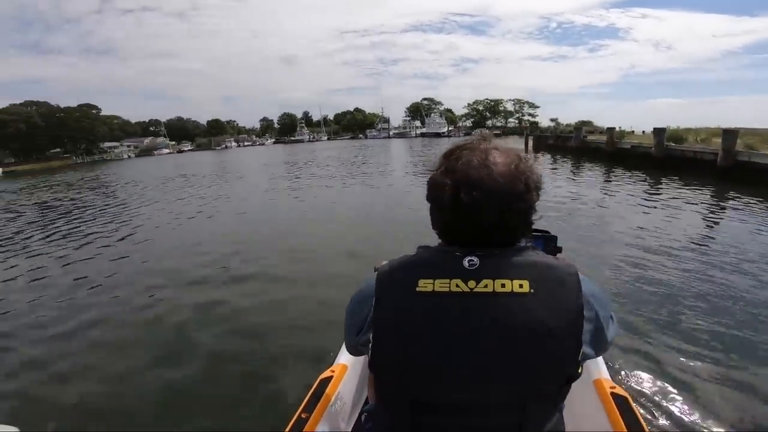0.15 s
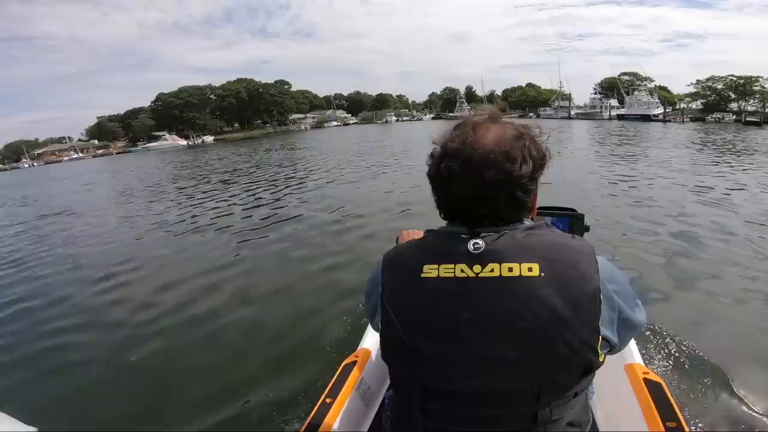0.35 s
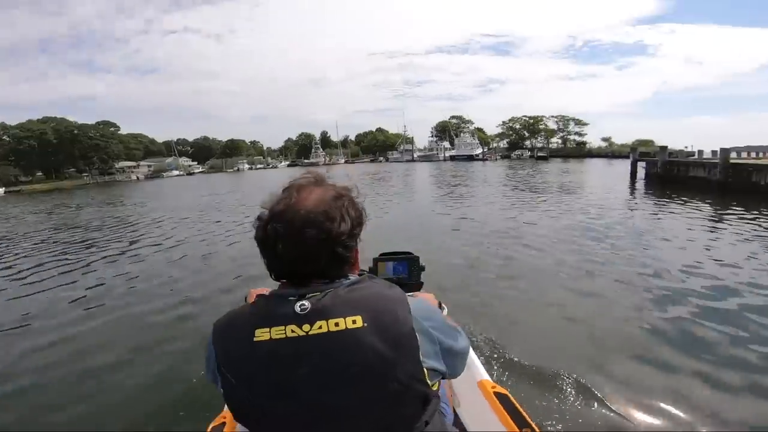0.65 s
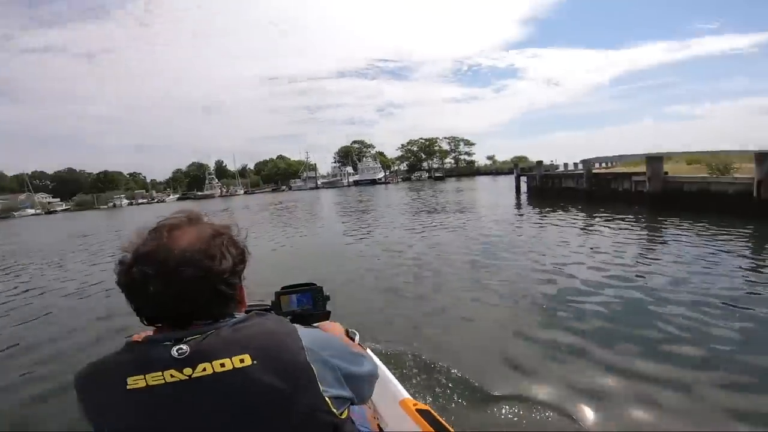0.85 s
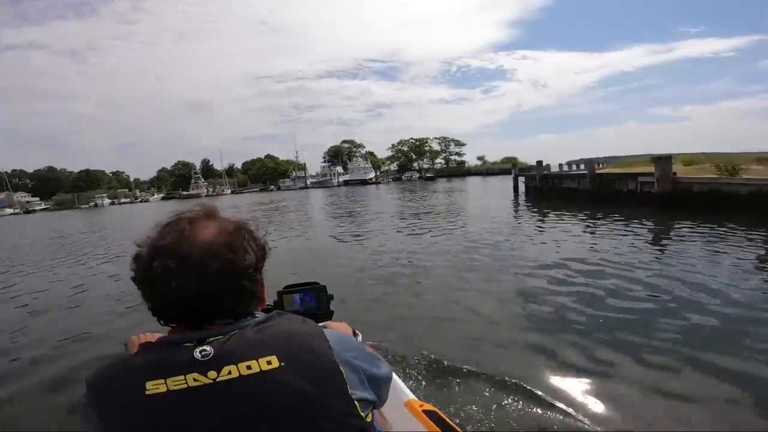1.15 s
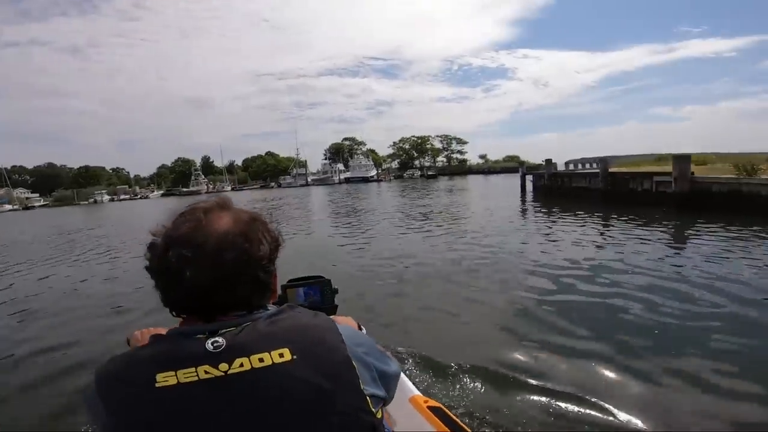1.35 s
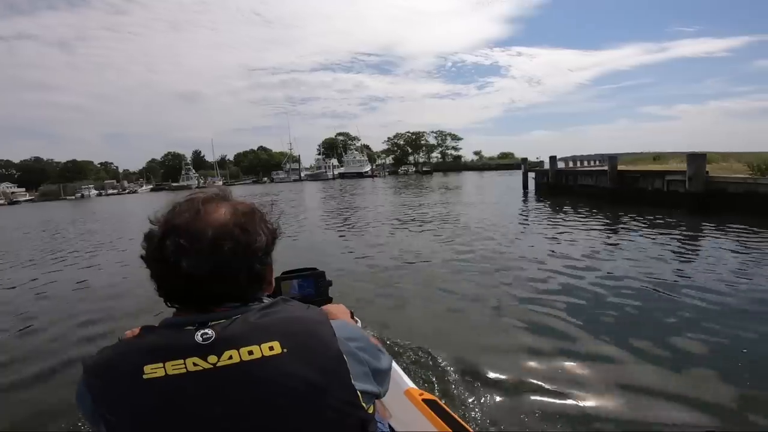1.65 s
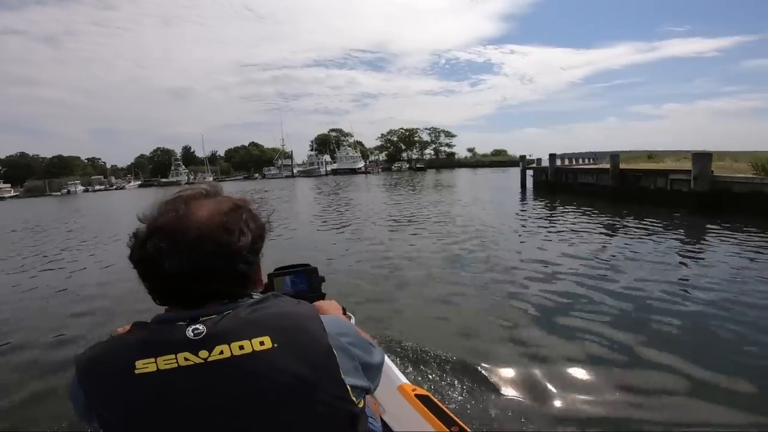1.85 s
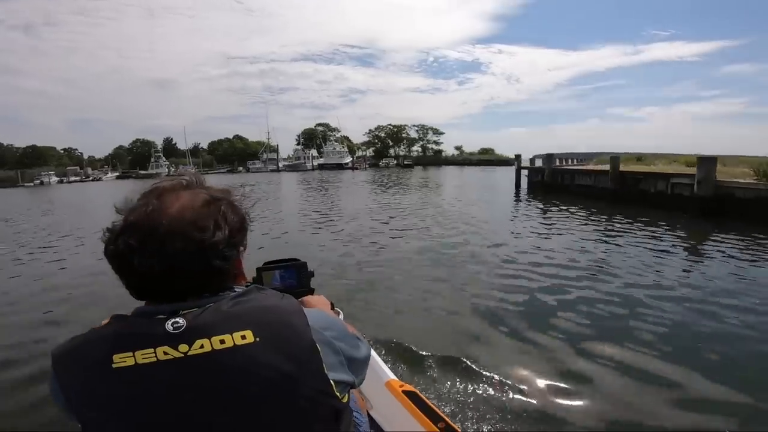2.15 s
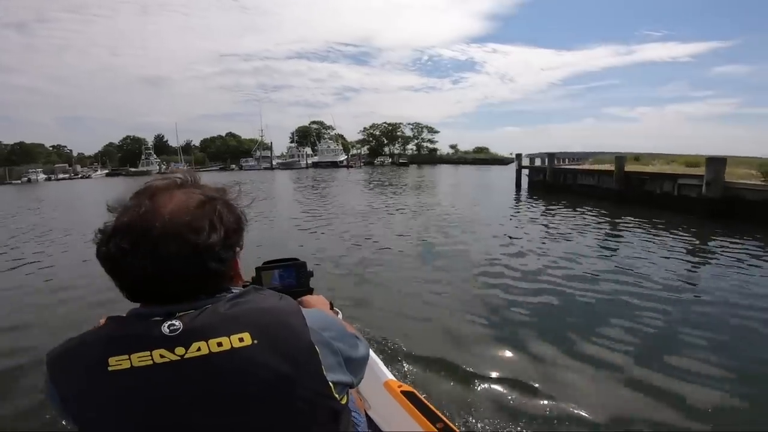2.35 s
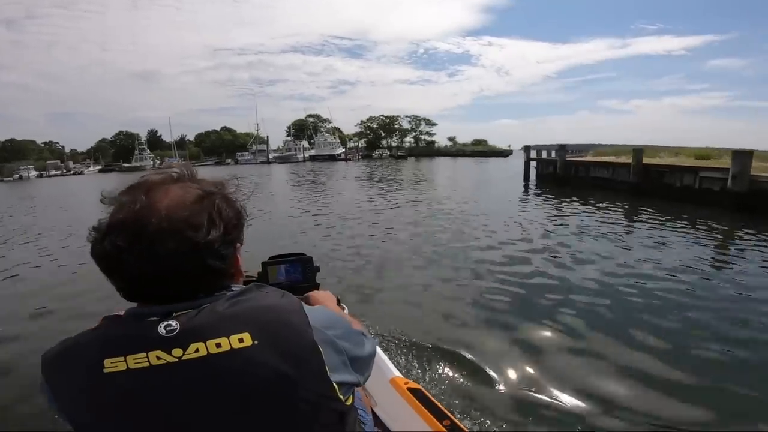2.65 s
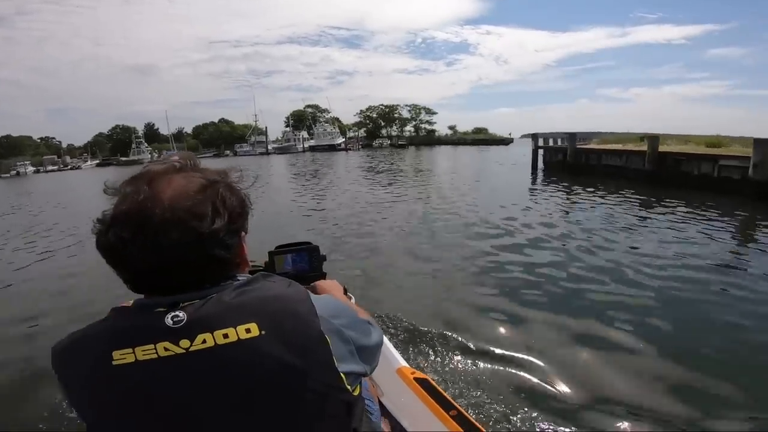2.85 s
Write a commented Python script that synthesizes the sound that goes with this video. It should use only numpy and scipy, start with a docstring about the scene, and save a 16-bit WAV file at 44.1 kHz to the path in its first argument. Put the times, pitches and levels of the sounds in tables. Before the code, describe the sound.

A personal watercraft engine idles with a low, gurgling thrum, heard from the back seat on calm water. After a brief dropout near the start, water washes and small waves slap the hull, and the exhaust grows louder.

```python
"""A personal watercraft idles across a calm harbor, heard from the back seat.
From the start its three-cylinder engine thrums and gurgles through a wet exhaust and shakes the hull,
water washes, fizzes and drips, and a light hiss spurts over low wind. At 0.4 s the sound cuts out.
At 0.58 s it fades back in as mono, with more wash, no hiss and the exhaust outlet under water.
Small waves then slap the hull, and from 2.3 s the exhaust grows louder."""
import sys
import numpy as np
from scipy import signal
from scipy.fft import rfft, irfft
from scipy.io import wavfile
from scipy.ndimage import uniform_filter1d

SR = 44100
rng = np.random.default_rng(int(sys.argv[2]) if len(sys.argv) > 2 else 0)


def digitize_waveform(pressure):
    """Quantize a signal to 16-bit integers and store it at the path in sys.argv[1].

    Rows of a 2-D input are taken as channels; values are limited to [-1, 1].
    """
    field = np.atleast_2d(pressure).T
    bounded = np.clip(field, -1, 1)
    quanta = np.round(bounded * 32767).astype(np.int16)
    wavfile.write(sys.argv[1], SR, quanta)


N = 132300
TIME = np.arange(N) / SR
FREQS = np.fft.rfftfreq(N, 1 / SR)
CUT_S, RETURN_S = .4005, .58


def amp(db):
    """Decibels to gain."""
    return 10 ** (np.asarray(db) / 20)


def unit(x):
    """Scales to rms 1."""
    return x / np.sqrt(np.mean(x ** 2) + 1e-20)


def curve(rows, column=1):
    """One column of a time table, at every sample."""
    rows = np.array(rows)
    return np.interp(TIME, rows[:, 0], rows[:, column])


def at_hz(rows, hz):
    """Interpolates a table on a log-frequency axis."""
    row_hz, value = np.transpose(rows)
    return np.interp(np.log(hz + 1), np.log(row_hz), value)


def resonate(x, spectrum):
    """Minimum-phase filter with this spectrum; output at rms 1."""
    log_gain = np.log(amp(at_hz(spectrum, abs(np.fft.fftfreq(N, 1 / SR)))))
    response = np.exp(np.conj(signal.hilbert(log_gain)))[:len(FREQS)]
    return unit(irfft(rfft(x) * response, N))


def churn(spectrum, patch_db, flicker_db, correlation=None, size=512):
    """Stereo noise with random patches in time and frequency and a shared flicker."""
    hop = size // 4
    frames, hz = N // hop + 5, np.fft.rfftfreq(size, 1 / SR)
    mid_re, mid_im, side_re, side_im, patches = rng.standard_normal((5, frames, len(hz)))
    patches = uniform_filter1d(patches, size=14, axis=0)
    patches = unit(uniform_filter1d(patches, size=7, axis=1))
    flicker = unit(uniform_filter1d(rng.standard_normal(frames), size=5))[:, None]
    alike = 0 if correlation is None else at_hz(correlation, hz)
    mid = np.sqrt(1 + alike) * (mid_re + 1j * mid_im)
    side = np.sqrt(1 - alike) * (side_re + 1j * side_im)
    gain = amp(at_hz(spectrum, hz) + patch_db * patches + flicker_db * flicker)
    bins = np.array([mid + side, mid - side]) * gain
    _, noise = signal.istft(bins.transpose(0, 2, 1), nperseg=size, noverlap=size - hop)
    return unit(noise[:, :N])


def muffler(clicks, spectrum, center_hz=200, delay_s_per_hz=.00009):
    """Rounds each click into a thud and draws it out, low notes first."""
    delay_s = delay_s_per_hz * np.clip(FREQS - center_hz, -center_hz / 2, center_hz / 2)
    phase = 2 * np.pi * np.cumsum(delay_s) * FREQS[1]
    return unit(irfft(rfft(clicks) * amp(at_hz(spectrum, FREQS)) * np.exp(-1j * phase), N))


# Each row: time in seconds, thrum level in dB, gurgle level in dB.
EXHAUST_LEVELS = [(0, -26, -35), (.4, -25.7, -34), (.65, -28.8, -35), (.95, -29, -33.5),
                  (1.3, -27.2, -30.5), (1.55, -29, -33), (1.8, -30, -35), (2.05, -29.3, -33),
                  (2.25, -28.5, -32), (2.29, -23.5, -26.5), (2.5, -23.5, -24.3), (2.62, -24.2, -26),
                  (2.75, -23.2, -25), (2.88, -23, -26.5), (3, -23, -27)]
# Each entry: one cylinder's relative strength in dB with the outlet fully submerged.
CYLINDER_DB = [-2.2, -.6, 2.0]
# Each row: time in seconds, boost of the nearest firing in dB.
COUGHS = [(1.103, 3), (1.235, 2.5), (1.297, 2.5), (2.287, 2), (2.485, 1), (2.55, 1.5), (2.726, 4.5),
          (2.812, 1), (2.985, 3)]
# Pipe and hull, outlet submerged or clear. Each row: frequency in Hz, relative gain in dB.
PIPE_SUBMERGED = [(25, -40), (60, -28), (105, -27), (137, -11), (183, -.5), (229, -.5), (274, -11),
                  (330, -19), (450, -30), (800, -40), (2000, -53), (5000, -83), (12000, -125)]
PIPE_CLEAR = [(25, -31.5), (60, -20.5), (100, -12.5), (137, 4), (183, 6.5), (229, 1), (274, -9),
              (330, -7.5), (450, -29), (800, -51), (2000, -51), (5000, -77.5), (12000, -125)]


def exhaust_thrum(firing_count, submerged, scatter_db=.9, jitter_s=.00036):
    """Firings thud in the pipe; under water their strength and timing turn uneven."""
    onsets = np.flatnonzero(np.diff(np.floor(firing_count)) > 0) + 1
    scatter, jitter = rng.standard_normal((len(onsets), 2)).T
    uneven = np.sqrt(submerged[onsets])
    cylinder_db = np.take(CYLINDER_DB, firing_count[onsets].astype(int), mode="wrap")
    strength_db = uneven * (cylinder_db + scatter_db * scatter)
    for time_s, boost_db in COUGHS:
        strength_db[np.argmin(abs(TIME[onsets] - time_s))] += boost_db
    onsets += (jitter_s * SR * uneven * jitter).astype(int)
    clicks = np.zeros(N)
    clicks[np.clip(onsets, 0, N - 1)] = amp(strength_db)
    thuds = submerged * muffler(clicks, PIPE_SUBMERGED) + (1 - submerged) * muffler(clicks, PIPE_CLEAR)
    return thuds * amp(curve(EXHAUST_LEVELS))


# Broad gurgle, and a narrow bubbling tone heard when its pitch briefly lifts.
# Each row: frequency in Hz (the tone's before lift_ratio), relative density in dB.
GURGLE_SPECTRUM = [(40, -23.5), (115, -28), (150, 4.5), (200, -2.5), (260, 4), (310, -9.5), (420, -19),
                   (800, -28), (3000, -74.5), (10000, -100)]
BUBBLE_SPECTRUM = [(60, -40), (150, -16), (185, 0), (215, 0), (255, -14), (500, -36), (5000, -100)]


def exhaust_gurgle(firing_count, submerged):
    """Gas bubbles out, puffed by the strongest cylinder; the pitch lifts once, briefly."""
    puff_lag_firings, puff_width_cycles, puff_depth = .1, .12, .8
    lift_center_s, lift_half_s, lift_ratio = 2.43, .14, 1.25
    cycles = (firing_count - np.argmax(CYLINDER_DB) - puff_lag_firings) / len(CYLINDER_DB)
    from_puff = (cycles + .5) % 1 - .5
    puffs = unit(1 + puff_depth * submerged * np.exp(-(from_puff / puff_width_cycles) ** 2))
    gas = rng.standard_normal(N)
    lift = np.exp(-((TIME - lift_center_s) / lift_half_s) ** 2)
    lifted = resonate(gas, np.multiply(BUBBLE_SPECTRUM, [lift_ratio, 1]))
    bubbling = (1 - lift) * resonate(gas, GURGLE_SPECTRUM) + lift * lifted
    return bubbling * puffs * amp(curve(EXHAUST_LEVELS, column=2))


# Each row: time in seconds, level in dB.
HUM_LEVEL = [(0, -46), (.4, -44), (.7, -42), (1.6, -38), (2.2, -35.5), (3, -36)]


def hull_hum(firing_count):
    """The hull shakes at the firing rate."""
    return amp(curve(HUM_LEVEL)) * unit(np.sin(2 * np.pi * firing_count))


# Each row: time in seconds, firings per second.
FIRING_RATE = [(0, 45.55), (.15, 45.7), (.4, 45.7), (.6, 45.9), (.9, 46.15), (1.12, 45.25), (1.35, 46.0),
               (1.55, 45.25), (1.75, 45.75), (2.1, 45.95), (2.25, 45.1), (2.36, 45.7), (2.48, 45.0),
               (2.65, 45.75), (3, 45.4)]
# Each row: time in seconds, outlet submersion from 0 to 1.
SUBMERSION = [(0, .12), (.4, .12), (.6, .95), (2.55, .95), (2.75, .6), (3, .5)]


def engine():
    """One crank times the thrum, gurgle and hum; its phase jumps as the sound returns."""
    offset_firings = np.where(TIME < RETURN_S, .1, -.465)
    firing_count = np.cumsum(curve(FIRING_RATE)) / SR + offset_firings
    submerged = curve(SUBMERSION)
    exhaust = exhaust_thrum(firing_count, submerged) + exhaust_gurgle(firing_count, submerged)
    return exhaust + hull_hum(firing_count)


# Each row: time in seconds, wash level in dB, fizz level in dB.
WATER_LEVELS = [(0, -36, -47), (.12, -36.5, -48.5), (.4, -36, -46.5), (.62, -33, -45.5), (.73, -34, -47.5),
                (.81, -31.5, -43.5), (.94, -32.5, -42.5), (1.11, -30.5, -42), (1.25, -33, -42.5),
                (1.6, -33.5, -41), (1.77, -33, -40.5), (1.92, -31, -42), (2.15, -29, -40.5),
                (2.48, -31.5, -40.5), (2.76, -30, -42), (3, -31, -41)]
# Each row: frequency in Hz, relative density in dB.
WASH_SPECTRUM = [(20, -3.5), (45, 3.5), (70, 6), (110, 3.5), (300, 5), (380, -0.5), (480, 0.5), (620, -2),
                 (900, -10), (1400, -20), (2500, -34), (5000, -75.5), (12000, -87)]
FIZZ_SPECTRUM = [(200, 2), (600, -14), (1100, 4.5), (1800, -2.5), (3000, -7), (4200, -15), (5500, -25),
                 (7800, -26.5), (10000, -41.5), (12000, -40.5), (14500, -54), (16000, -78)]
# Each row: frequency in Hz, left-right correlation.
WATER_CORRELATION = [(60, 1), (130, 0.79), (300, 0.9), (630, 0.74), (1300, -.2), (3000, 0.22), (6600, 0.12)]


def bow_wave():
    """The bow wave washes along the hull and its foam fizzes."""
    wash = churn(WASH_SPECTRUM, patch_db=.5, flicker_db=1, correlation=WATER_CORRELATION, size=1024)
    fizz = churn(FIZZ_SPECTRUM, patch_db=1.38, flicker_db=1.23, correlation=WATER_CORRELATION)
    return wash * amp(curve(WATER_LEVELS)) + fizz * amp(curve(WATER_LEVELS, column=2))


def droplets(rate_per_s=700, level_db=-47, pitches=36, decay_cycles=1.15, tilt_db_per_octave=-6.5):
    """Droplets and small bubbles ping with rising pitch, following the level of the fizz."""
    t, out = np.arange(0, .03, 1 / SR), np.zeros((2, N))
    for hz in np.geomspace(700, 9000, pitches):
        envelope = np.exp(-t * hz / decay_cycles) * (1 - np.exp(-t * hz))
        ping = np.sin(2 * np.pi * hz * t * (1 + 4 * t)) * envelope
        strength_db = np.minimum(rng.exponential(1, N), 4.5)
        hits = rng.random(N) < rate_per_s / pitches / SR
        pings = signal.oaconvolve(amp(strength_db) * hits, ping)[:N]
        pan = rng.uniform(-.3, .3)
        out += np.outer([1 + pan, 1 - pan], pings) * amp(tilt_db_per_octave * np.log2(hz))
    foam = amp(curve(WATER_LEVELS, column=2))
    return amp(level_db) * unit(out) * unit(foam)


# Each row: time in seconds, level in dB.
HISS_LEVEL = [(0, -39), (.03, -38.5), (.085, -47), (.15, -51), (.19, -38), (.21, -47), (.238, -34.5),
              (.266, -57), (.36, -57.5), (.4, -38)]
# Each row: frequency in Hz, relative density in dB.
HISS_SPECTRUM = [(150, 12), (700, 5.5), (1500, 1.5), (2300, -2), (3000, -3), (4700, -5), (6000, -8),
                 (7500, -6.5), (10000, -10.5), (11500, -25), (14500, -27.5), (16000, -29)]


def hiss():
    """A wide hiss in short spurts, at the opening only."""
    noise = churn(HISS_SPECTRUM, patch_db=1.5, flicker_db=-.5)
    return noise * amp(curve(HISS_LEVEL)) * (TIME < RETURN_S)


def whistle(pitch_hz=5900, width_hz=340, level_db=-48.5, fade_s=.049):
    """A narrow band of noise whistles with the first spurt of hiss."""
    band = np.exp(-.5 * ((FREQS - pitch_hz) / width_hz) ** 2)
    noise = unit(irfft(rfft(rng.standard_normal((2, N))) * band, N))
    return noise * amp(level_db) * np.exp(-(TIME / fade_s) ** 2)


# Each row: time in seconds, mid level in dB.
WIND_LEVEL = [(0, -36), (.2, -36), (.33, -34), (.39, -28), (.6, -38.5), (3, -40)]
# Each row: frequency in Hz, relative density in dB.
WIND_SPECTRUM = [(3, -20), (16, -9), (30, 0), (44, -9), (90, -10), (150, -26), (500, -58), (5000, -105)]


def wind(side_gain=.386):
    """Wind rumbles low, with one gust just before the cut."""
    mid, side = (resonate(noise, WIND_SPECTRUM) for noise in rng.standard_normal((2, N)))
    return (mid + side_gain * np.array([side, -side])) * amp(curve(WIND_LEVEL))


# Each row: start in seconds, level in dB, pitch in Hz, decay in seconds.
PLIPS = [(.363, -38.5, 2730, 0.0033), (0.672, -53, 6500, 0.00057), (2.12, -47, 7300, .001),
         (2.766, -42, 4620, 0.0011), (2.813, -52, 8590, 0.00056)]


def plips():
    """Single near drops ring briefly."""
    out = np.zeros(N)
    for start_s, db, hz, decay_s in PLIPS:
        t = np.maximum(TIME - start_s, 0)
        out += amp(db) * np.exp(-t / decay_s) * np.sin(2 * np.pi * hz * t)
    return out


# Each row: center in seconds, level in dB, pitch in Hz, half length in seconds, relative bandwidth.
SLAPS = [(0.803, -42, 633, 0.0067, 0.23), (0.819, -33, 600, 0.026, 0.1), (0.823, -58.5, 3860, 0.12, .15),
         (0.962, -46.5, 1970, 0.021, 0.18), (1.051, -44, 1830, 0.028, 0.17), (1.114, -27, 106, 0.025, 0.47),
         (1.249, -35.5, 370, 0.085, 0.16), (1.414, -34, 424, 0.021, 0.39), (1.547, -25.5, 119, 0.022, 0.28),
         (1.578, -46, 2550, 0.013, .1), (1.603, -37, 69, 0.21, 0.13), (1.95, -36, 680, 0.0093, 0.32),
         (2.107, -32, 110, 0.023, 0.9), (2.636, -39, 920, 0.0033, 0.39), (2.715, -24, 370, 0.0056, 0.34)]


def wave_slaps():
    """Each small wave strikes the hull with a short swell of noise, hollow or broad."""
    out = np.zeros(N)
    for center_s, db, hz, half_s, width in SLAPS:
        band = np.exp(-.5 * (np.log((FREQS + 1) / hz) / width) ** 2)
        body = unit(irfft(rfft(rng.standard_normal(N)) * band, N))
        out += amp(db) * body * np.exp(-.5 * ((TIME - center_s) / half_s) ** 2)
    return out


def scene():
    """Engine in the middle, water and air around it."""
    return engine() + bow_wave() + droplets() + plips() + wave_slaps() + hiss() + whistle() + wind()


def record(dry, drop_db=-15, decay_db_per_s=-1500, fade_in_s=.1, lowpass_hz=15100):
    """The stereo sound cuts out and fades back in as mono, low-passed throughout."""
    tail = amp(drop_db + decay_db_per_s * np.maximum(TIME - CUT_S, 0))
    cut = np.where(TIME < CUT_S, 1, tail)
    fade_in = np.clip((TIME - RETURN_S) / fade_in_s, 0, 1) ** 1.66
    lowpass = signal.firwin(511, lowpass_hz, window=("kaiser", 9), fs=SR)
    return signal.oaconvolve(dry * cut + dry.mean(0) * fade_in, lowpass[None], "same", axes=1)


dry = scene()
out = record(dry)
digitize_waveform(out)
```